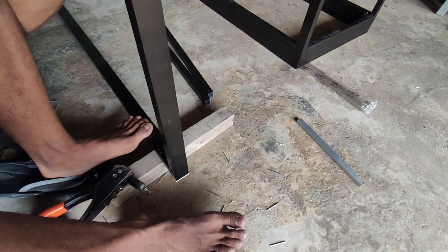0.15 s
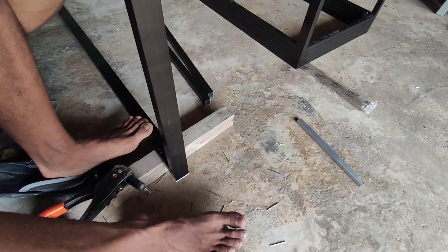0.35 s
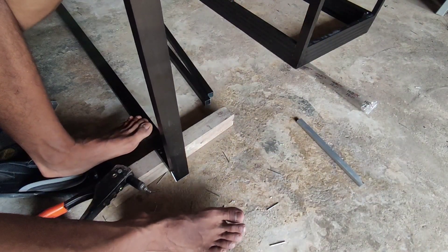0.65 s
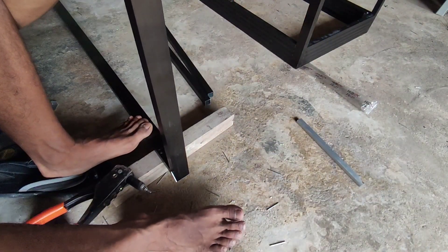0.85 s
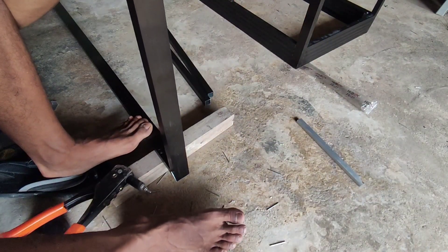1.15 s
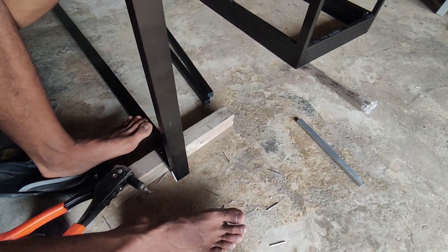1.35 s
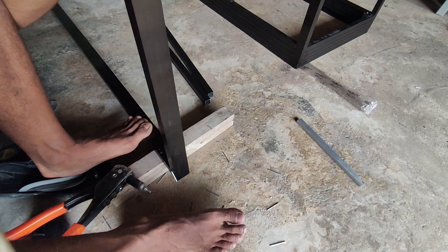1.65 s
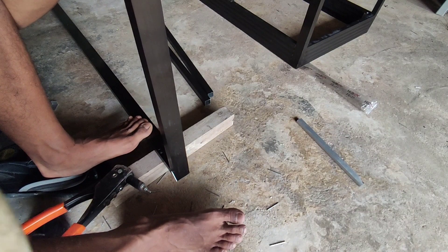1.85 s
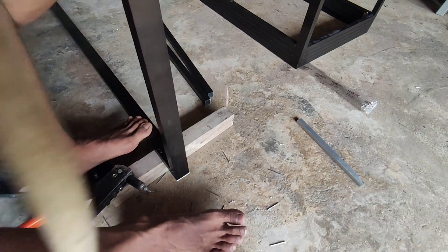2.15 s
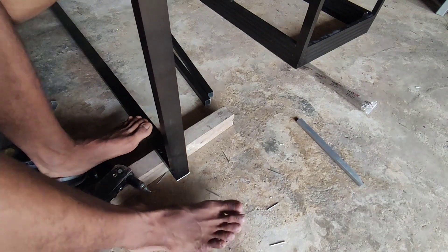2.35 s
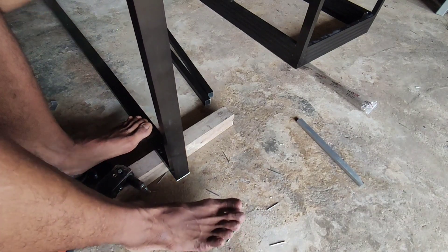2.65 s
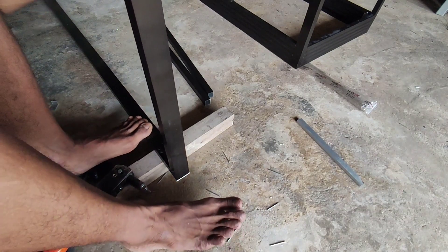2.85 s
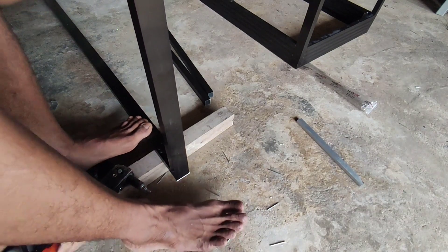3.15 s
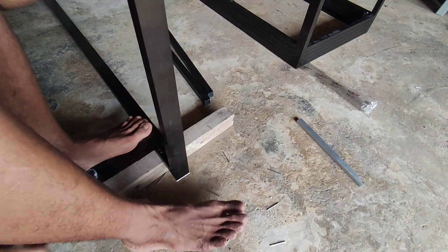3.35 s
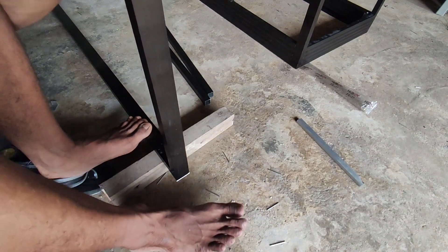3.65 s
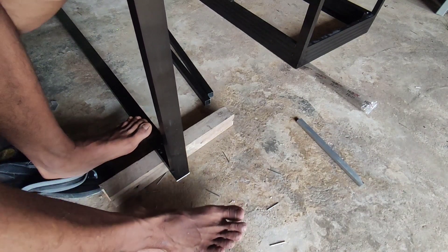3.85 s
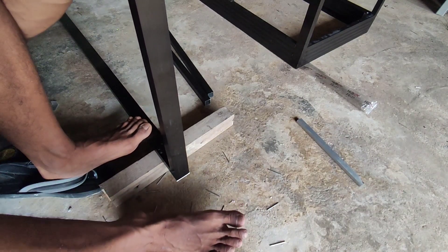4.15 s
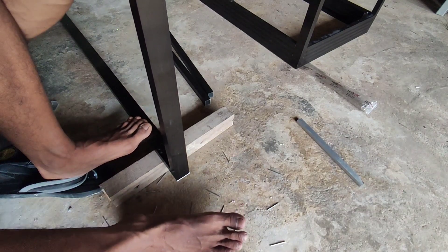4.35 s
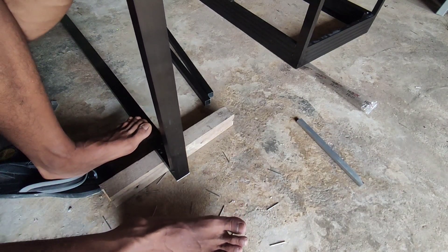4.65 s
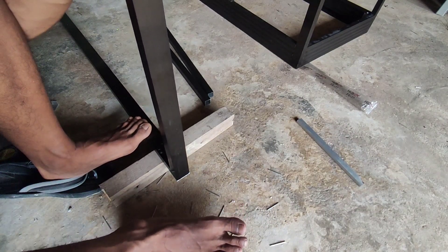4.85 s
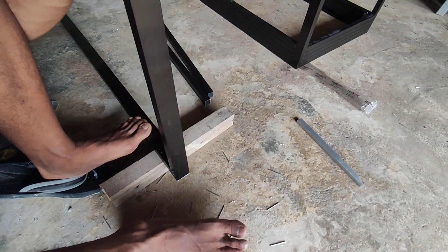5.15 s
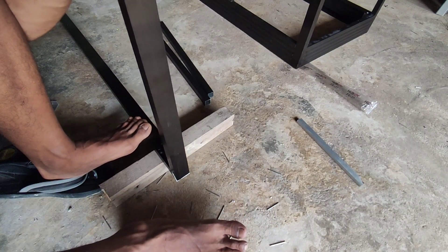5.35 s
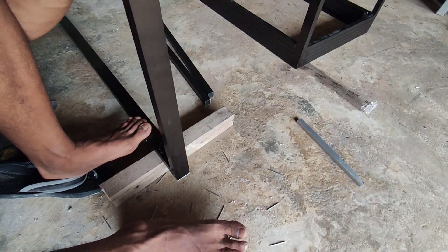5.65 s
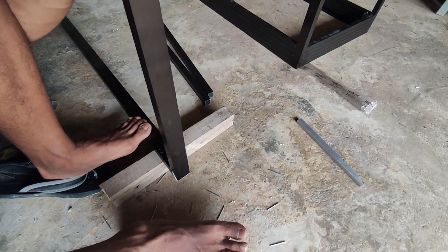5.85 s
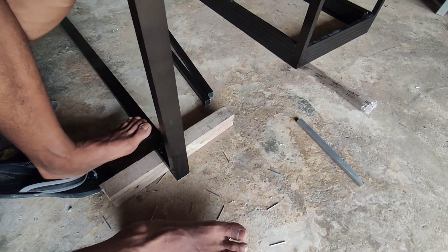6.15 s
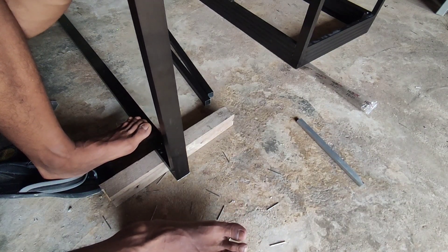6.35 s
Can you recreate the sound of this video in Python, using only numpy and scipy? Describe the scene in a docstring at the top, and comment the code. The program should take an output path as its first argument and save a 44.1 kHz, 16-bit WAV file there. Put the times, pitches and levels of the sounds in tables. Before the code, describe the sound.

Close to a hand-held microphone, light metallic taps lead into a short, loud burst of an electric drill working on a metal frame. The motor then winds down slowly in a falling, wavering whine, with low handling rumble underneath. As it dies away, tools clack and scrape against the frame and the concrete floor, with small squeaks and the sharpest knocks near the end. The background is very quiet between sounds.

```python
"""A few light taps on a metal frame, then an electric hand drill runs up, bites into the frame, is released
and coasts down for seconds, its motor tones swelling as they sweep through the casing's resonances.
Tools knock, scrape and squeak on the frame and the concrete floor. Everything is close to a hand-held,
almost mono microphone: the grip rumbles on it, and the background falls away between sounds."""
import sys
import numpy as np
from scipy import signal
from scipy.fft import rfft, irfft, next_fast_len
from scipy.io import wavfile
from scipy.ndimage import uniform_filter1d, map_coordinates

SR = 44100
rng = np.random.default_rng(int(sys.argv[2]) if len(sys.argv) > 2 else 0)


def wav_out(sig):
    """Save sig, one row per channel (or a flat mono array), as 16-bit PCM at SR to the path in sys.argv[1]."""
    wavfile.write(sys.argv[1], SR, np.round(np.clip(np.atleast_2d(sig).T, -1, 1) * 32767).astype(np.int16))


N = 286650
TOP_HZ = 15760  # upper band limit
# resonances of the metal frame: pitch_hz, width_hz, level_db
FRAME_MODES = [(617, 120, -4), (1120, 210, -1.5), (1560, 130, 0.5), (1960, 450, -8.5), (2640, 220, -12.5),
               (3380, 200, 4), (4030, 85, -1.5), (4580, 68, 2), (6020, 170, -4), (7600, 400, 5.5),
               (9700, 220, 2.5), (12000, 1500, -16)]


def motor():
    """The motor runs up and coasts down; its commutator rate (Hz) and phase drive every drill tone."""
    # motor speed: time_s, commutator_rate_hz
    speed = [(.78, 2500), (.87, 4650), (.95, 5900), (1.0, 6420), (1.1, 7030), (1.3, 7390), (1.55, 7620),
             (1.7, 7470), (1.8, 7050), (1.93, 6400), (2.0, 5830), (2.2, 4615), (2.4, 4144), (2.55, 3906),
             (2.8, 3496), (3.2, 2971), (3.5, 2606), (3.7, 2385), (3.98, 2089), (4.3, 1783), (4.61, 1503),
             (4.8, 1330), (5.03, 1145), (5.3, 935), (5.7, 630), (5.9, 480)]
    rate, = curves(speed, off=0)
    return rate, 2 * np.pi * np.cumsum(rate) / SR


def commutator_whine(rate, phase):
    """The brushes whine on the coasting commutator; each tone swells as it crosses a casing resonance."""
    # loudness of the whine: time_s, level_db
    whine_levels = [(1.95, -70), (2.2, -43), (2.4, -49), (2.66, -44), (3.05, -47), (3.3, -56), (3.55, -47),
                    (3.8, -41), (4.1, -44), (4.3, -38), (4.45, -41), (4.56, -39), (4.72, -51), (5.08, -52),
                    (5.25, -66), (5.7, -61), (5.85, -81)]
    # commutator tones: multiple_of_rate
    multiples = [1, 1.5, 2, 2.5, 3, 3.08, 3.5, 4, 4.5, 5, 6, 7, 8, 9, 10, 11, 12, 13, 14]
    # strength of each tone: level_db
    strengths = [-0.5, -15, 1.5, -14, -0.5, -5, -17.5, -2.5, -20.5, -1.5, -7, -4, -6, -5.5, -5.5, -7.5, -9,
                 -9, -7]
    # casing resonances: pitch_hz, width_hz, level_db
    casing = [(1750, 250, -14), (2250, 130, -0.5), (2666, 70, 9.5), (3190, 150, -10.5), (3660, 350, -7),
              (4210, 130, -6.5), (4730, 310, -7.5), (5700, 260, -1.5), (6880, 500, -2), (7250, 200, 0),
              (7870, 350, 7), (9360, 380, -11), (11700, 460, -13), (13500, 460, -17), (15000, 600, -27)]
    whine_db, = curves(whine_levels)
    out = np.zeros(N)
    for multiple, db in zip(multiples, strengths):
        hz = multiple * rate
        brush_bounce = .8 * wobble(50) + .6 * wobble(250)  # radians; smears the tone
        flutter_db = 1.8 * wobble(12) + 4 * wobble(40)
        gain = amp(whine_db + db + flutter_db) * resonance_gain(casing, hz) * (hz < TOP_HZ)
        out += gain * np.sin(multiple * phase + brush_bounce)
    return out


def drive_tones(rate, phase):
    """The gears sing under load, then one runs free; two more whines sound while current flows."""
    # loaded gear tones: multiple_of_rate
    gears = [.169, .225, .30, .448]
    # strength of each gear tone: level_db
    strengths = [-31, -32, -44, -32]
    # gearbox resonances that the loaded tones sweep through: pitch_hz, width_hz, level_db
    gearbox = [(1080, 250, -2), (1280, 250, -4), (1500, 300, -4), (1700, 120, -3), (2100, 150, 4),
               (2350, 250, 5), (3400, 90, -8)]
    # resonances that the free gear sweeps through: pitch_hz, width_hz, level_db
    free_gearbox = [(660, 60, -35), (770, 40, -42), (1040, 70, -31)]
    # whines of the powered motor: multiple_of_rate, loudest_at_hz, width_hz, level_db
    whines = [(.667, 3600, 1200, -27), (2, 13600, 1100, -27)]
    free_gear = .254  # multiple of the rate
    loaded, free, powered = (swell(start_s, end_s - start_s, rise=.06, fade=.06)
                             for start_s, end_s in [(.87, 2.19), (2.33, 3.56), (.85, 1.97)])
    tones = [(k, amp(db) * resonance_gain(gearbox, k * rate) * loaded) for k, db in zip(gears, strengths)]
    tones += [(free_gear, resonance_gain(free_gearbox, free_gear * rate) * free)]
    tones += [(k, resonance_gain([peak], k * rate) * powered) for k, *peak in whines]
    out = np.zeros(N)
    for multiple, gain in tones:
        backlash = .9 * wobble(40) + .55 * wobble(200)  # radians; smears the tone
        flutter_db = 4 * wobble(30) + 1.5 * wobble(8)
        out += gain * amp(flutter_db) * np.sin(multiple * phase + backlash)
    return out


def rattle_and_hiss():
    """Gears rattle, fan and brushes hiss; both noises change colour as the load comes off."""
    # loudness of the drill's noise: time_s, rattle_db, hiss_db
    levels = [(.765, -80, -78), (.796, -23, -23), (.88, -24, -16), (1.68, -24.5, -16), (1.85, -29, -21.5),
              (2.0, -33, -25), (2.12, -38, -31), (2.64, -44, -36), (2.72, -46, -42), (2.93, -48, -48),
              (3.7, -49, -50), (4.4, -55, -53), (4.78, -60, -57), (5.1, -68, -55), (5.25, -66, -64),
              (5.33, -77, -72), (5.45, -64, -62), (5.72, -68, -63), (5.81, -79, -73), (5.92, -86, -86)]
    # hiss spectrum under load: frequency_hz, level_db
    hiss_loaded = [(1410, -36), (2400, -5), (2560, -21), (3410, -3), (3720, -3.5), (4670, 2), (6290, -1),
                   (7710, 3.5), (8340, -0.5), (9160, 2), (10100, -9), (11400, -1), (14000, -7),
                   (15000, -10), (15600, -24.5)]
    # hiss spectrum while coasting: frequency_hz, level_db
    hiss_free = [(1410, -31), (2400, -22), (2740, -9), (2970, -14), (3410, 0), (4600, 4), (6050, -4),
                 (6910, 4), (8810, -2.5), (14200, -13), (15600, -20.5)]
    # rattle spectrum under load: frequency_hz, level_db
    rattle_loaded = [(120, -52.5), (200, -28.5), (260, -25), (418, -2.5), (518, -3.5), (770, 7),
                     (1050, -3.5), (1360, 2), (1700, -2.5), (1840, -4.5), (2210, 0.5), (2560, -12.5),
                     (3000, 2.5), (3900, -37.5), (6600, -120)]
    # rattle spectrum while coasting: frequency_hz, level_db
    rattle_free = [(120, -44.5), (200, -5.5), (272, -30), (304, -6), (834, 0.5), (1440, -4), (1820, -4),
                   (2060, -7.5), (2340, -3.5), (3000, -11), (3900, -45.5), (6600, -120)]
    free = np.clip((np.arange(N) / SR - 1.9) / 0.83, 0, 1)  # 0 under load, 1 coasting
    hiss = np.sqrt(1 - free) * patchy(noise(hiss_loaded, grain_db=0.5), depth_db=1.2)
    hiss += np.sqrt(free) * patchy(noise(hiss_free), depth_db=2.8)
    rattle = np.sqrt(1 - free) * noise(rattle_loaded, grain_db=1.5, grain_hz=97)
    rattle += np.sqrt(free) * noise(rattle_free, grain_db=1.5, grain_hz=260)
    rattle_db, hiss_db = curves(levels)
    rattle_db += 1.5 * free * wobble(15)
    flutter_db = (.6 + .8 * free) * wobble(18)
    return (amp(rattle_db) * rattle + amp(hiss_db) * hiss) * amp(flutter_db)


def knocks():
    """Each tool blow is a crack and a short noise burst, ringing the frame's modes at new strengths."""
    # blows on frame and floor: start_s, level_db, body_gain_db, top_gain_db, t60_s, crack_gain_db
    blows = [(0.0446, -40, -8, 5.5, 0.019, 3), (0.2897, -52, -19, -17, 0.055, 10),
             (0.4381, -26, -22, 2, 0.034, 3), (0.7941, -14.5, 13.5, -3, 0.15, -0.5),
             (1.8629, -1.5, -16, -9, 0.093, 0.5), (2.9966, -36, 19, 5, 0.066, 3),
             (3.1524, -44, 21, 1, 0.05, 3), (3.5398, -31, 6, -2.5, 0.05, 4),
             (3.816, -27, -10, -14.5, 0.057, 7.5), (4.4046, -30.5, -1, -4.5, 0.046, 9),
             (4.8284, -27, 0.5, -7, 0.046, 4.5), (4.8863, -18, -3, -10.5, 0.022, -2),
             (4.9896, -23, -13.5, 7, 0.05, 5.5), (5.4041, -4.5, -27, -5, 0.05, 4),
             (5.4816, -7.5, -9, -9.5, 0.043, 5), (5.9831, -31, 16, -23, 0.034, 13),
             (6.0445, -52.5, 0.5, -6.5, 0.048, 4), (6.1647, -27, 11, -16.5, 0.05, 1),
             (6.2069, -7, -8, -13.5, 0.041, 4.5), (6.2661, 4.5, -52, -11.5, 0.042, 5.5),
             (6.3574, -14, -14, -17.5, 0.056, 8.5), (6.4105, -31, -27, -1, 0.05, -1.5)]
    out, t = np.zeros(N + SR), np.arange(SR // 4) / SR
    for start_s, db, body_db, top_db, t60_s, crack_db in blows:
        attack = 1 - np.exp(-t / 0.00023)
        decay = amp(-60 * t / t60_s) + amp(crack_db - 60 * t / 0.002)
        burst = rng.standard_normal(len(t)) * attack * decay
        colour = [(200, body_db - 28.5), (400, body_db), (2000, body_db), (3000, 0.0044), (5500, 0.0074),
                  (7000, top_db - 1), (15000, top_db - 19)]
        struck = [(hz, width, level + rng.normal(0, 3)) for hz, width, level in FRAME_MODES]
        ring = filtered(burst, lambda f: spectrum_gain(colour, f) * (modes(struck, f) + amp(-13.5)))
        out[round(start_s * SR):][:len(t)] += amp(db - 3) * ring
    return out[:N]


def scrapes():
    """Tools slide grittily, mostly around the blows; the frame colours the two lower of three bands."""
    # slides: full_at_s, rise_s, held_s, fade_s, bright_db, body_db, top_db
    slides = [(.048, .022, .002, .055, -45, -56, -46), (.09, .03, .03, .45, -95, -73, -99),
              (.29, .03, .005, .03, -79, -85, -78), (.437, .022, .01, .042, -40, -64, -45),
              (.47, .03, .05, .25, -80, -73, -90), (.662, .025, .005, .045, -85, -72, -49),
              (.72, .05, .04, .02, -71, -76, -79), (.794, .03, .004, .02, -28, -22, -32),
              (1.862, .01, .01, .2, -25, -31, -25), (2.07, .01, .005, .06, -33, -40, -33),
              (2.14, .02, .02, .08, -42, -36, -40), (3.55, .02, .005, .05, -48, -60, -54),
              (3.83, .015, .01, .05, -44, -50, -56), (4.41, .01, .005, .07, -41, -43, -46),
              (4.829, .008, .045, .03, -37, -55, -48), (4.888, .016, .001, .012, -16.5, -33, -23),
              (4.896, .01, .02, .09, -31, -40, -34), (4.988, .016, .008, .03, -31, -43, -31),
              (5.03, .03, .05, .1, -64, -72, -53), (5.404, .018, .022, .045, -26, -34, -30),
              (5.483, .014, .001, .025, -16, -15, -23.5), (5.5, .012, .04, .04, -36, -30, -43),
              (5.69, .03, .03, .06, -64, -70, -63), (5.985, .014, .001, .04, -53, -29, -63.5),
              (6.02, .04, .06, .12, -70, -65, -67), (6.162, .012, .035, .03, -42, -39, -56),
              (6.209, .012, .002, .014, -25, -30, -28), (6.22, .01, .022, .02, -39, -35, -45),
              (6.266, .018, .001, .045, -17.5, -18.5, -23), (6.29, .02, .03, .08, -41, -38, -49),
              (6.36, .014, .002, .04, -40, -34, -41.5), (6.412, .01, .01, .05, -64, -69, -55),
              (6.468, .07, .002, .06, -80, -72, -48)]
    # spectrum of the grit: frequency_hz, level_db
    grit = [(150, -16.5), (250, -4), (399, -5), (694, 0.5), (963, 1.5), (1510, 0), (1860, -4), (1990, 7.5),
            (3350, -12.5), (4050, -5), (5430, -11), (6570, -7.5), (8230, -14.5), (14800, -19),
            (15600, -29.5)]

    def through_frame(x):
        return unit(filtered(x, lambda f: modes(FRAME_MODES, f) + amp(-12.5)))

    bright = through_frame(noise(grit, lo_hz=2330, hi_hz=5950, grain_db=3.5, grain_hz=300))
    body = through_frame(noise(grit, lo_hz=220, hi_hz=2500, grain_db=1.0, grain_hz=170))
    top = noise(grit, lo_hz=6300, grain_db=3.0, grain_hz=400)
    return strokes(slides, np.array([bright, body, top]))


def squeaks():
    """Short rings and squeaks: narrow noise at one resonance, swelling and fading."""
    # rings and squeaks: start_s, length_s, pitch_hz, width_hz, level_db
    rings = [(0.182, .12, 1574, 15, -74), (.665, .09, 680, 120, -68), (1.839, 0.32, 3310, 80, -29.5),
             (1.897, 0.14, 1320, 240, -35), (2.136, 0.04, 1236, 250, -27), (2.204, .09, 3240, 730, -28.5),
             (2.267, 0.095, 1640, 150, -36), (2.327, 0.1, 6320, 300, -37), (2.407, .08, 6140, 510, -30),
             (2.417, 0.11, 1660, 260, -37), (2.514, 0.084, 1710, 290, -36), (2.99, 0.21, 800, 210, -34.5),
             (3.358, 0.07, 1380, 300, -43.5), (3.432, .1, 2700, 82, -40), (3.688, 0.079, 4660, 300, -41.5),
             (3.813, 0.049, 4850, 360, -34.5), (3.83, .06, 5530, 150, -44),
             (3.825, 0.067, 2820, 130, -46.5), (4.18, 0.39, 2330, 350, -51),
             (4.595, 0.125, 9120, 300, -50.5), (4.831, 0.13, 812, 42, -42.5),
             (4.843, .08, 1460, 240, -35.5), (4.961, 0.0585, 1640, 200, -36.5),
             (5.39, 0.043, 1470, 270, -33), (5.961, 0.051, 1713, 140, -37.5),
             (6.214, 0.0414, 650, 100, -35.5), (6.41, 0.049, 4760, 500, -46),
             (5.222, 0.058, 1290, 650, -64), (5.656, 0.14, 579, 8.2, -56), (5.676, 0.06, 7600, 500, -60.5),
             (5.906, .07, 573, 150, -73), (6.02, .06, 600, 200, -53), (4.9, .2, 9500, 400, -52),
             (5.02, .1, 7900, 300, -50), (6.255, 0.053, 522, 150, -29.5), (6.192, 0.035, 3280, 390, -26),
             (6.399, 0.1, 572, 48, -62.5), (6.443, 0.055, 7600, 710, -50)]
    out = np.zeros(N + SR)
    for start_s, length_s, hz, width, db in rings:
        band = filtered(rng.standard_normal(SR // 2), lambda f: np.abs(modes([(hz, width, 0)], f)) ** 2)
        n = round(length_s * SR)
        settled = unit(band[4000:4000 + n])
        out[round(start_s * SR):][:n] += amp(db) * settled * signal.windows.tukey(n, .6)
    return out[:N]


def hand_rumble():
    """Lumpy low rumble from the hand on the microphone, and thuds through the floor."""
    # spectrum of the deep rumble: frequency_hz, level_db
    deep_spectrum = [(8.8, -15), (15, 0.5), (38, 1.5), (92, -4), (130, -3), (280, -22), (317, -29.5),
                     (400, -33), (520, -59), (880, -120)]
    # spectrum of the thuds: frequency_hz, level_db
    thud_spectrum = [(71, -48), (120, -6.5), (259, -4), (328, -4.5), (398, -9), (450, -11), (580, -38),
                     (990, -120)]
    # steady rumble of the grip: time_s, deep_db, thud_db
    grip_levels = [(0, -95, -97), (.05, -86, -84), (.75, -84, -84), (.85, -56, -52), (1.3, -49, -47),
                   (2.0, -45, -51), (2.45, -58, -62), (2.8, -68, -68), (5.1, -68, -71), (5.9, -82, -84),
                   (6.15, -68, -71), (6.5, -68, -69)]
    # bumps against microphone and floor: full_at_s, rise_s, held_s, fade_s, deep_db, thud_db
    bumps = [(.06, .03, .01, .3, -70, -70), (.47, .07, .07, .08, -68, -66), (1.44, .15, .01, .12, -39, -51),
             (1.86, .07, .005, .08, -37, -42), (2.284, .12, .005, .08, -30, -48),
             (2.55, .05, .1, .05, -24, -42), (2.994, .06, .02, .1, -59, -54),
             (3.77, .1, .02, .15, -60, -62), (4.418, .04, .02, .06, -63, -50),
             (4.874, .07, .01, .12, -57, -66), (4.93, .05, .07, .08, -66, -54),
             (5.484, .015, .056, .05, -65, -38), (5.982, .02, .02, .04, -62, -41),
             (6.265, .03, .06, .1, -63, -44)]
    deep = noise(deep_spectrum, hi_hz=162, grain_db=3.5, grain_hz=13)
    thud = noise(thud_spectrum, lo_hz=141, hi_hz=380, grain_db=4.5, grain_hz=30)
    deep_db, thud_db = curves(grip_levels)
    grip = amp(deep_db + 3 * wobble(8)) * deep + amp(thud_db + 3 * wobble(8)) * thud
    return grip + strokes(bumps, np.array([deep, thud]))


def stereo_spread(mono):
    """While the drill pulls, left leads and right lags in three falling bands; the rest stays centred."""
    # bands that part in phase: from_hz, to_hz, width_hz, phase_shift_rad
    bands = [(1720, 990, 280, 1.05), (3090, 2210, 250, 1.05), (3830, 2920, 360, 1.2)]
    start_s, end_s = .79, 1.86
    hz, t, spectra = signal.stft(mono, SR, nperseg=1024, noverlap=768)
    pulling = (t > start_s) & (t < end_s)
    shift = 0
    for from_hz, to_hz, width, angle in bands:
        centre_hz = np.interp(t, [start_s, end_s], [from_hz, to_hz])
        offset = 2 * (hz[:, None] - centre_hz) / width
        shift += pulling * angle * np.clip(1 - offset ** 2, 0, 1) ** 2
    left_right = spectra * np.exp(1j * np.array([shift, -shift]))
    return signal.istft(left_right, SR, nperseg=1024, noverlap=768)[1][:, :N]


def amp(db):
    return 10 ** (np.asarray(db) / 20)


def unit(x):
    return x / np.sqrt(np.mean(x ** 2) + 1e-20)


def curves(rows, off=-120):
    """One value per sample for each column after the time; off outside the rows."""
    times, *columns = np.transpose(rows)
    return [np.interp(np.arange(N) / SR, times, column, off, off) for column in columns]


def wobble(rate):
    """A smooth random curve, rate knots a second."""
    knots = rng.standard_normal(int(N * rate / SR) + 4)
    return map_coordinates(knots, [np.arange(N) * rate / SR])


def swell(full_at, held, rise, fade):
    """Gain that climbs 30 dB per rise seconds until full_at, holds, then loses 30 dB per fade seconds."""
    t = np.arange(N) / SR - full_at
    return amp(-30 * np.clip(np.maximum(-t / rise, (t - held) / fade), 0, 5))


def strokes(rows, layers):
    """One swell a row, each with its own mix of the noise layers."""
    return sum(swell(full_at, held, rise, fade) * (amp(levels_db) @ layers)
               for full_at, rise, held, fade, *levels_db in rows)


def filtered(x, response):
    """x through a complex response, given as a function of frequency."""
    size = next_fast_len(x.shape[-1] + 8192)
    return irfft(rfft(x, size) * response(np.fft.rfftfreq(size, 1 / SR)), size)[..., :x.shape[-1]]


def spectrum_gain(points, hz):
    """Gain at hz between (frequency_hz, level_db) points on a log frequency axis."""
    frequencies, levels_db = np.transpose(points)
    return amp(np.interp(np.log(hz + 1), np.log(frequencies + 1), levels_db))


def modes(resonances, f):
    """Causal response of (pitch_hz, width_hz, level_db) resonances, alternating in sign."""
    return sum((-1) ** k * amp(db) * 1j * f * width / (hz * hz - f * f + 1j * f * width)
               for k, (hz, width, db) in enumerate(resonances))


def resonance_gain(resonances, hz):
    """Gain of a tone at hz among (pitch_hz, width_hz, level_db) resonances."""
    return sum(amp(db) / (1 + (2 * (hz - centre) / width) ** 2) for centre, width, db in resonances)


def noise(spectrum, lo_hz=0, hi_hz=SR, grain_db=0, grain_hz=300):
    """Noise of rms 1 in a band of a spectrum, roughened by random gain."""
    def response(f):
        band_loss = np.sqrt((1 + (lo_hz / (f + 1)) ** 8) * (1 + (f / hi_hz) ** 8))
        return spectrum_gain(spectrum, f) / band_loss

    grainy = rng.standard_normal(N) * amp(grain_db * wobble(grain_hz))
    return unit(filtered(grainy, response))


def patchy(x, depth_db):
    """x with patches of random gain in time and frequency, at rms 1."""
    spectra = signal.stft(x, nperseg=512)[2]
    patches = uniform_filter1d(rng.standard_normal(spectra.shape), size=8, axis=0)
    patches = unit(uniform_filter1d(patches, size=10, axis=1))
    return unit(signal.istft(spectra * amp(depth_db * patches), nperseg=512)[1][:N])


def scene():
    """Drill and tools lie close together in front of the hand-held microphone."""
    rate, phase = motor()
    drill = commutator_whine(rate, phase) + drive_tones(rate, phase) + rattle_and_hiss()
    return stereo_spread(drill + knocks() + scrapes() + squeaks() + hand_rumble())


def record(dry):
    """The loudest peaks are softly clipped, and nothing is kept above the band limit."""
    soft = dry / (1 + np.abs(dry / .8) ** 6) ** (1 / 6)
    return filtered(soft, lambda hz: hz < TOP_HZ)


dry = scene()
out = record(dry)
wav_out(out)
```